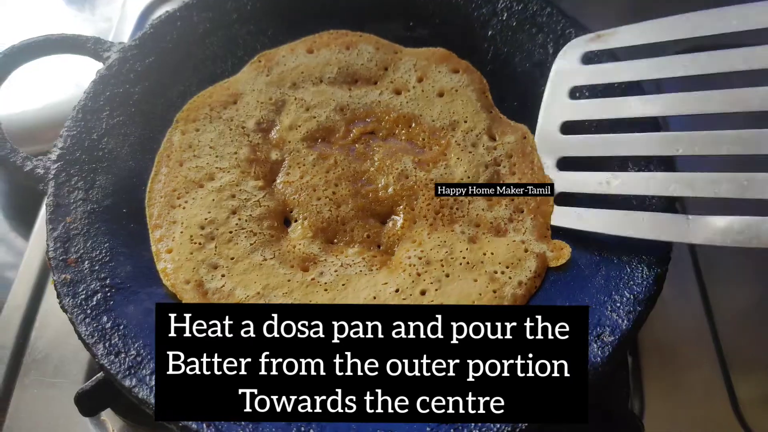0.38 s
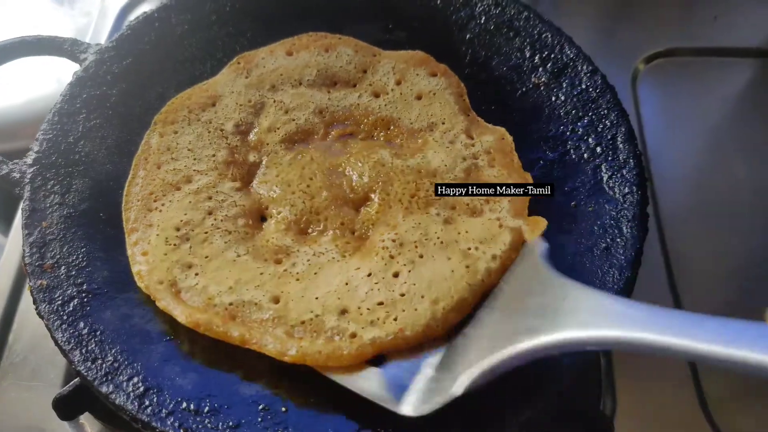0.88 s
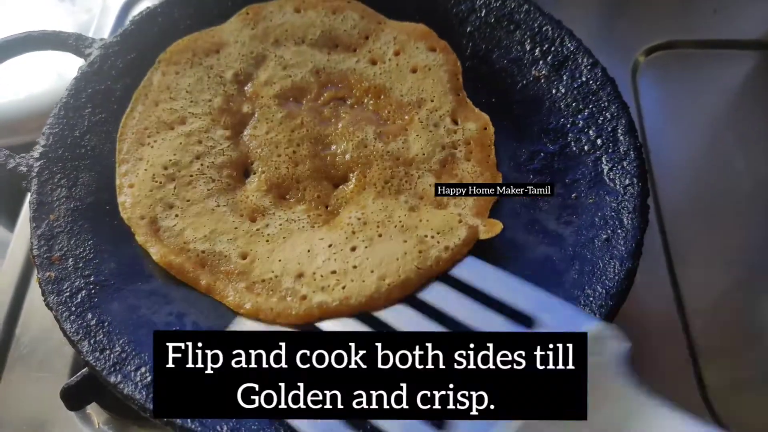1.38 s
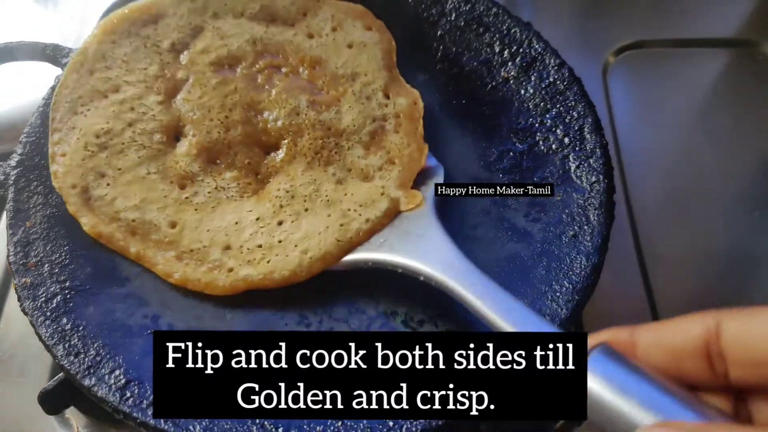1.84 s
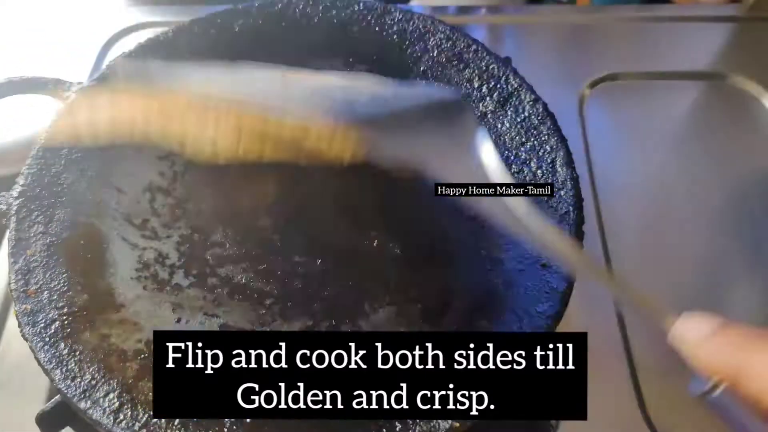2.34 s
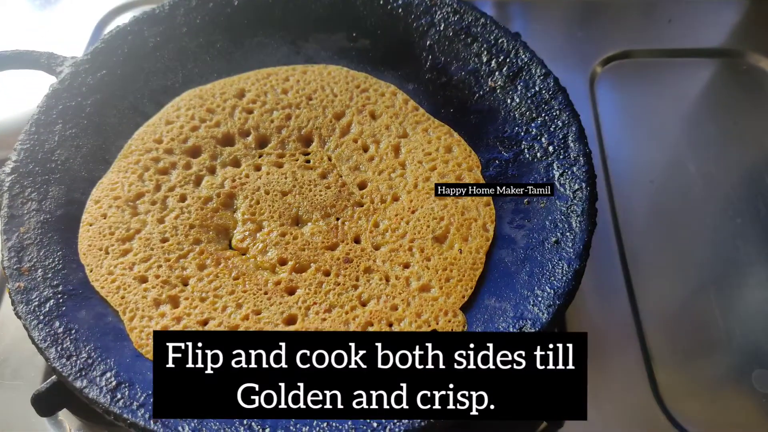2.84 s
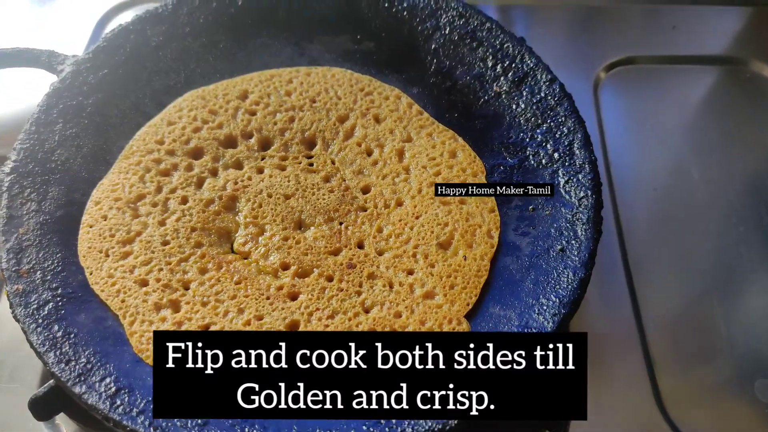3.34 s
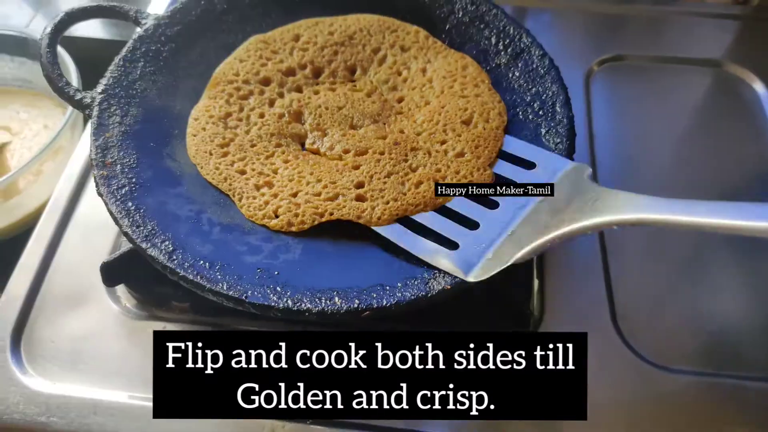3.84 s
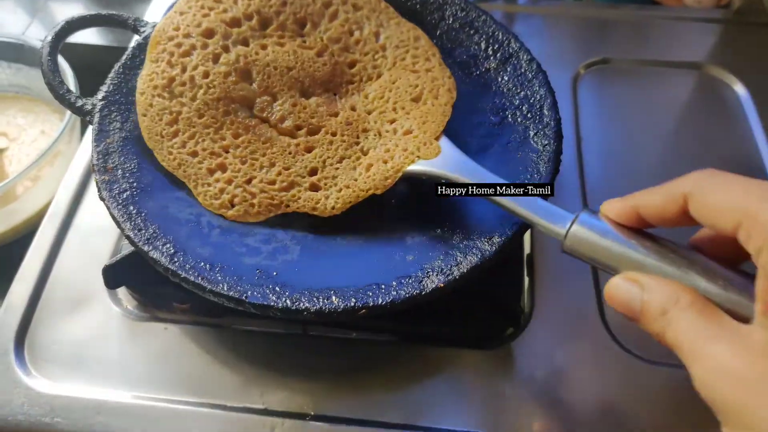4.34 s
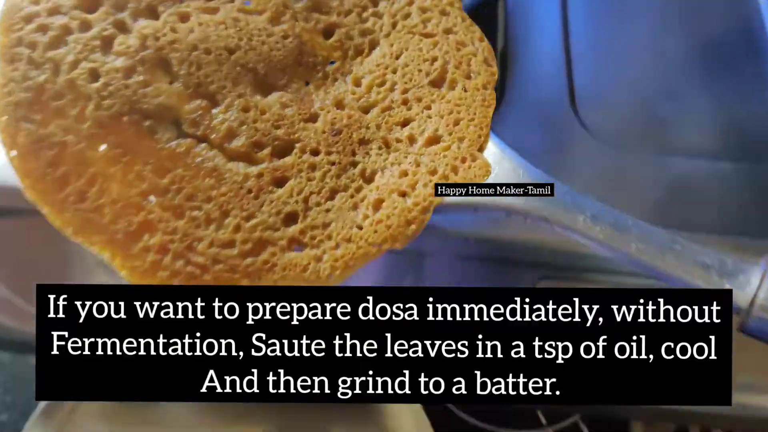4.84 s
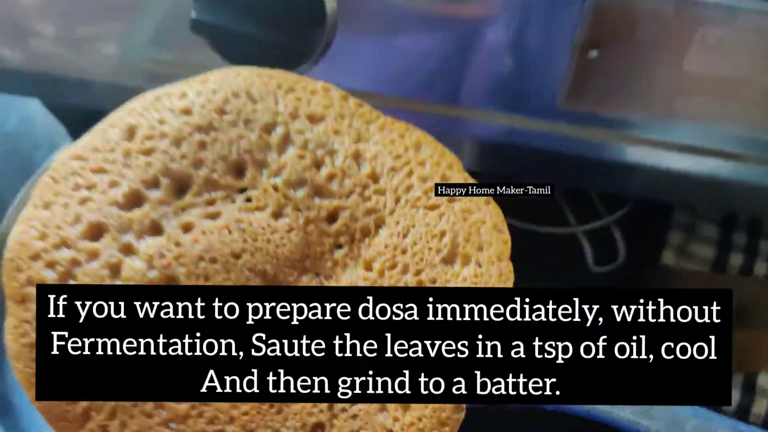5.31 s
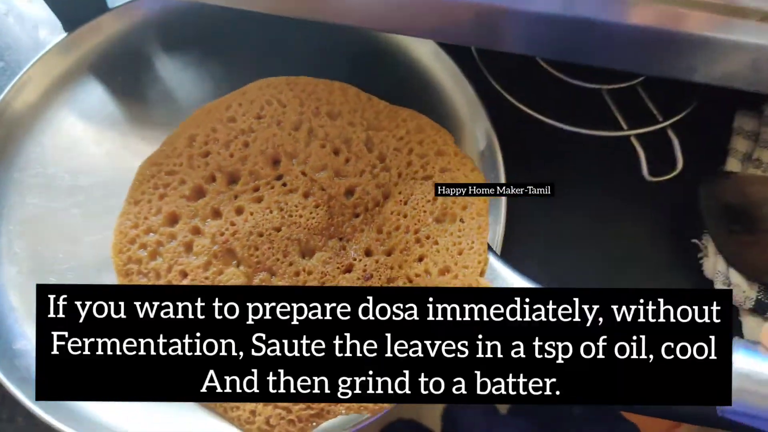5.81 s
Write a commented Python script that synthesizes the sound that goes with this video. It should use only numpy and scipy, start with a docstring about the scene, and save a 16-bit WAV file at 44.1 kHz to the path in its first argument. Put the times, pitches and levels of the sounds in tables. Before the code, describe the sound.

Silence for about 0.2 s, then a quick fade-in to a fine, steady frying hiss close to a phone microphone, over a low wavering motor hum near 100 and 200 Hz and soft kitchen rumble. From 0.8 to 1.7 s a steel spatula scrapes jerkily over rough iron, with blade tones around 2.7 to 5.4 kHz fluttering and fading and a few tiny fat ticks. At about 2.4 s the turned cake bursts into bright, dense crackle with many sharp spits, the strongest near 2.8 and 3.3 s. The hum weakens from about 2.5 s and stops by 3.3 s. Sound cuts hard at 3.6 s, with silence until 3.84 s. A calmer stretch fades in: steady hiss and rumble, a short scrape with a ring near 3.95 s, a few spits, a faint tick at 4.8 s and a barely audible scrape near 5.65 s. Crackle and metal lean right; low baseline thumps follow each start.

```python
"""A thick pancake fries on an iron griddle close to a phone; silence comes before each of two stretches.
First there is steady hiss (fizzing noise), motor hum (wavering tones) and kitchen rumble (soft noise).
A steel spatula scrapes and rings (jerky noise in resonances); then lively frying crackles (noise bursts).
Fat spits throughout (short clicks); the hum weakens and stops before the second, calmer stretch.
Two microphone ports colour the treble differently; the baseline swings soon after each stretch starts."""
import sys
import numpy as np
from scipy import signal
from scipy.fft import rfft, irfft
from scipy.io import wavfile
from scipy.ndimage import uniform_filter1d

SR = 44100
rng = np.random.default_rng(int(sys.argv[2]) if len(sys.argv) > 2 else 0)


def gain_from_decibels(decibels):
    """Convert decibel values to linear amplitude factors."""
    exponent = np.asarray(decibels, float) / 20
    return 10 ** exponent


def generate_wav(signal):
    """Clip the signal to [-1, 1] and save it as 16-bit WAV at the path in sys.argv[1]."""
    frames = np.transpose(np.atleast_2d(signal))
    scaled = np.clip(frames, -1, 1) * 32767
    pcm = np.round(scaled).astype(np.int16)
    wavfile.write(sys.argv[1], SR, pcm)


N = 261954
T = np.arange(N) / SR  # time [s]
HZ = np.arange(N // 2 + 1) * SR / N + 1  # frequency [Hz], raised by 1 to avoid zero


def curve(table, column):
    """Gain over time from rows of levels; silent outside them."""
    rows = np.array(table)
    return gain_from_decibels(np.interp(T, rows[:, 0], rows[:, column], left=-200, right=-200))


def shape(points):
    """Gain per frequency from (frequency [Hz], level [dB]) points."""
    hz, db = np.transpose(points)
    return gain_from_decibels(np.interp(np.log(HZ), np.log(hz), db))


def colour(x, gain):
    """Filter by a gain per frequency."""
    return irfft(rfft(x) * gain, N)


def resonance(hz, width):
    """Response of one ringing mode, gain 1 at its centre."""
    return 1 / (1 + 1j * (HZ ** 2 - hz ** 2) / (HZ * width))


def causal(gain):
    """Minimum-phase response with the same gain, so that clicks stay sharp."""
    cepstrum = irfft(np.log(gain), N)
    cepstrum[1:N // 2] *= 2
    cepstrum[N // 2 + 1:] = 0
    return np.exp(rfft(cepstrum))


# How each microphone port colours sound: (frequency [Hz], level [dB])
LEFT_PORT = [(1000, -0.5), (2400, 0), (3000, 1), (3800, -5), (4500, -6.5), (4900, -21), (5200, -25),
             (5500, -29), (6000, -6.5), (7000, 1), (8200, 8), (9200, 1.5), (10300, -2), (14500, -6),
             (15600, -14)]
RIGHT_PORT = [(1000, -0.5), (2400, -0.5), (3000, -1.5), (4000, 3), (4700, 3.5), (5300, 9.5), (5800, 2.5),
              (6700, -7), (7700, -26.5), (8200, -49), (8900, -33), (9600, -60.5), (10500, -13.5),
              (12500, -15), (15600, -7.5)]


def port_responses():
    """Each port has its own peaks and notches; the left one hears the treble later than the right."""
    lag_s = 0.0003615 / (1 + (700 / HZ) ** 2)  # fades out in the bass
    left = causal(shape(LEFT_PORT)) * np.exp(-2j * np.pi * HZ * lag_s)
    right = causal(shape(RIGHT_PORT))
    return np.array([left, right]) * (HZ < 15800)


PORTS = port_responses()


def unit(x, lo_hz, hi_hz):
    """Scale so that the band, heard as the average of both ports, has rms 1."""
    middle = (rfft(x) * PORTS).mean(axis=0)
    band = middle[(HZ > lo_hz) & (HZ < hi_hz)]
    return x * N / np.sqrt(2 * np.sum(np.abs(band) ** 2))


def walk(rate):
    """Random levels held 1 / rate s and smoothed twice; spread near 1."""
    hold = int(SR / rate)
    steps = np.repeat(rng.standard_normal(N // hold + 1), hold)
    return 2.25 * uniform_filter1d(uniform_filter1d(steps, hold), hold)[:N]


def pair(alike):
    """Two noises, left and right, that share a part."""
    mid, side = rng.standard_normal((2, N))
    share = np.clip(alike, 0, 1)
    return colour(mid, np.sqrt(1 + share)) + colour(side, np.sqrt(1 - share)) * np.array([[1], [-1]])


def grains(rate, spread_db):
    """Clicks at random moments, some much larger; each reaches the two ports with its own size."""
    happens, luck = rng.random((2, N))
    size = (happens < rate / SR) * gain_from_decibels(-spread_db * np.log(1 - .97 * luck))
    return size * rng.standard_normal((2, N))


def pan(db):
    """Left and right gains that differ by db."""
    return gain_from_decibels(np.array([[db], [-db]]) / 2)


def between(start, end, edge):
    """1 from start to end, 0 elsewhere, with ramps of edge s."""
    return np.clip(np.minimum(T - start, end - T) / edge + .5, 0, 1)


# Lively frying after the cake is turned: (time [s], level [dB])
FRY = [(2.2, -54), (2.355, -58), (2.372, -32.5), (2.388, -32), (2.4, -45), (2.44, -36), (2.55, -44.5),
       (2.72, -39), (2.82, -52), (2.9, -40.5), (3.03, -44), (3.21, -39.5), (3.298, -43), (3.308, -34.5),
       (3.39, -60), (3.41, -43), (3.62, -41.5)]


def fry():
    """Fresh batter on hot fat: dense, bright crackle of tiny noise bursts near the right port."""
    clicks = grains(rate=700., spread_db=4.8)
    burst = np.exp(-T[:300] / 0.00089) * rng.standard_normal(300)
    crackle = signal.fftconvolve(clicks, burst[None], axes=1)[:, :N]
    mix = crackle / crackle.std() + 0.76 * pair(.2)
    tone = shape([(700, -22.5), (2000, -3.0), (4000, -1.5), (8000, -3), (15000, 1.5)])
    return unit(colour(mix, tone) * pan(-6.5), 4500, 6900) * curve(FRY, column=1)


# Steady hiss: (time [s], level [dB])
HISS = [(.18, -47), (.83, -46.5), (1.8, -46.5), (2.34, -47), (2.39, -43.5), (3.62, -45.5), (3.84, -44.5),
        (4.1, -46), (5.95, -47.5)]


def hiss():
    """Steam leaving the batter through countless pores, with a fine fizz of tiny bursts."""
    fizz = grains(rate=820.0, spread_db=2.0)
    steam = pair(0.33) * gain_from_decibels(0.51 * walk(12))
    mix = steam + .5 * fizz / fizz.std()
    return unit(colour(mix, 1 / (1 + (900 / HZ) ** 3)), 7300, 9480) * curve(HISS, column=1)


# Sharp ticks, mostly spitting fat, before colouring:
# (time [s], relative level [dB], left minus right [dB], centre frequency [Hz])
SPITS = [(0.957, -23.5, -8, 4910), (1.2285, -25, -11, 5350), (1.6794, -22.5, -17, 5220),
         (2.2286, -23, -6, 5300), (2.3725, -21, -12, 5000), (2.381, -20, -5, 5020),
         (2.418, -21, -8.5, 1780), (2.4406, -14, -5, 5180), (2.4713, -13, -8, 4560),
         (2.5316, -18.5, -3, 7970), (2.6264, -24, -7, 5410), (2.7646, -22, -13, 4980),
         (2.7739, -10.5, 3.5, 4730), (2.784, -15.5, -3, 8440), (2.8983, -21.5, -3, 5440),
         (2.9864, -21, -5, 5160), (3.022, -23, -6, 5000), (3.1447, -18.5, -7, 5070),
         (3.1857, -22.5, -9.5, 5080), (3.211, -21.5, -6.5, 5000), (3.2228, -23, -6, 4800),
         (3.256, -24.5, -5, 4500), (3.2612, -18, -4, 2300), (3.266, -21.5, -7, 4800),
         (3.3024, -5.5, 7, 4020), (3.3132, -19, 7, 3500), (3.4172, -16, 0, 5500), (3.5047, -19, -2.5, 4790),
         (3.5182, -17, 2, 5330), (3.8551, -20, -4, 5460), (3.937, -20, 4, 4470), (3.9883, -18.5, 5, 4500),
         (4.813, -28.5, -8, 4960)]


def spits():
    """A bubble bursts: a click of about one cycle with a sharp edge, then a short spray."""
    left_lead_s = .00011  # the fat spits nearer the left port than the other sources
    spray_t60_s = 0.019
    out = np.zeros((2, N + 2000))
    t = T[:2000] - .0012 + np.array([[left_lead_s], [0]])
    spray = rng.standard_normal((len(SPITS), 2, 2000))
    for (s, db, pan_db, hz), noise in zip(SPITS, spray):
        i = int(s * SR)
        click = 1.15 * np.exp(-(0.84 * hz * t) ** 2) * np.cos(2 * np.pi * hz * t + .6)
        edge = gain_from_decibels(-4) * np.exp(-(t / .00002) ** 2)
        tail = 0.44 * noise * np.exp(-np.log(1000) * t / spray_t60_s) * (t > 0)
        out[:, i:i + 2000] += gain_from_decibels(db) * pan(pan_db) * (click + edge + tail)
    tone = shape([(500, -11), (1500, 1.5), (3000, 1), (8000, 0.0), (15000, 1)])
    return colour(out[:, :N], causal(tone))


# Spatula dragged over the iron: (peak time [s], rise per 20 dB [s], fall per 20 dB [s],
# relative level [dB], drive of the pan body above it [dB])
SCRAPE = [(.8, .38, .1, -34, -12), (.85, .03, .11, -28, -4), (.97, .03, .2, -44, -12),
          (1.056, .08, .1, -33.5, -14.5), (1.178, .06, .15, -34, -15), (1.228, .1, .09, -28.5, -24),
          (1.368, .035, .15, -26.5, -23), (1.415, .08, .06, -23.5, -22.5), (1.464, .05, .04, -27, -14),
          (1.666, .45, .09, -30, -10.5), (1.85, .3, .1, -47.5, -4), (3.945, .04, .5, -39.5, -6.5),
          (4.03, .06, 0.2, -36, -13.5), (5.65, .1, .15, -48.5, -8)]


def strokes():
    """Pressure of the edge on the iron, and the share of it that drives the pan body."""
    push, body = 0, 0
    for s, rise, fall, db, body_db in SCRAPE:
        away = np.maximum((s - T) / rise, (T - s) / fall)
        power = gain_from_decibels(2 * (db - 20 * np.minimum(away, 10)))
        push = push + power
        body = body + power * gain_from_decibels(2 * body_db)
    return np.sqrt(push), np.sqrt(body)


# Ringing modes of the spatula blade and of the pan:
# (frequency [Hz], width [Hz], relative level [dB])
BLADE = [(2050, 200, -15), (2710, 90, -6), (3208, 65, -3.5), (3480, 80, -10.5), (4020, 77, -5.5),
         (4115, 55, -9), (4470, 60, -12.5), (4780, 79, -13), (5180, 29, -15), (5400, 110, -9.5),
         (6830, 27, -2), (7150, 34, -12.5), (7510, 89, -8), (10400, 67, -3.5), (11240, 100, -13.5)]
PAN_BODY = [(480, 200, -3.5), (1065, 300, 3), (1602, 68, 1), (1950, 200, 0)]


def scrape():
    """The edge catches on rough iron in quick jerks, feeding blade modes unevenly; the pan drones below."""
    jerks = grains(rate=1200., spread_db=3.0)
    rub = (jerks / jerks.std() + 1.1 * pair(.37)) * gain_from_decibels(0.85 * walk(60))
    push, drone = strokes()
    blade = 0
    for hz, width, db in BLADE:
        feed = rub * push * gain_from_decibels(3.5 * walk(24.96))
        blade = blade + gain_from_decibels(db) * colour(feed, resonance(hz, width))
    grit_tone = shape([(1500, -28.5), (3500, -10.5), (6000, -9), (9000, -11.0), (15000, -8)])
    grit = colour(rub * push, grit_tone)
    # after levelling, give the steel back the overall strength of the strokes
    steel = unit((blade + grit) * pan(-8.5), 2500, 6000) * np.sqrt(np.mean(push ** 2)) * gain_from_decibels(1.5)
    body_tone = sum(gain_from_decibels(db) * resonance(hz, width) for hz, width, db in PAN_BODY)
    body = unit(colour(rub, body_tone), 900, 2200) * drone * gain_from_decibels(-5.0) * pan(-2.5)
    return steel + body


# One blade mode singing out for a moment, before its flutter and the port colour:
# (time [s], rise [s], time to fall 60 dB [s], frequency [Hz], level [dB])
SINGS = [(0.844, .008, 0.21, 2710, -26), (.848, 0.0036, 0.038, 5520, -23.5), (1.15, 0.036, .4, 5400, -35.5),
         (1.501, 0.07, 0.54, 5400, -42), (1.597, 0.065, 0.22, 2710, -32), (1.6, 0.027, 0.51, 3970, -34.5),
         (1.859, 0.0033, 0.18, 2710, -38.5), (3.941, 0.021, 0.26, 4020, -36), (3.95, 0.021, .3, 2050, -41),
         (3.968, 0.026, 0.18, 1412, -29)]


def sings():
    """Single blade modes, heard as fluttering tones that swell and fade."""
    out = 0
    for s, rise, t60, hz, db in SINGS:
        t = np.maximum(T - s, 0)
        fall = np.exp(-np.log(1000) * np.maximum(t - rise, 0) / t60)
        swell = np.minimum(t / rise, 1) * fall
        tone = np.sin(2 * np.pi * hz * t) * gain_from_decibels(1.9 * walk(90))
        out = out + gain_from_decibels(db) * swell * tone * pan(-7.5)
    return out


# Motor hum tones: (frequency [Hz], relative level [dB], width of the waver [Hz])
HUM_LINES = [(98.7, 0.5, 2.4), (181.2, -9, 10), (198, -5, 4.5), (295, -33.5, 6), (373, -15, 15)]


def hum():
    """Mains motor tones that waver (narrow noise around a steady tone), throb slowly, weaken and stop."""
    level_db, throb_db, throb_s, throb_peak_s = -39.5, 1.5, 0.6, 0.57
    weakens_s, upper_earlier_s, weakens_db, stops_s = 2.65, 0.36, -9.5, 3.27
    lines = 0
    for hz, db, width in HUM_LINES:
        waver = colour(rng.standard_normal(N), resonance(hz, width) ** 2)
        tone = np.sin(2 * np.pi * hz * T) + .15 * waver / waver.std()
        start = weakens_s - upper_earlier_s * (hz > 150)  # the upper tones weaken first
        lines = lines + gain_from_decibels(db + weakens_db * between(start, 7, .2)) * tone
    throb = throb_db * np.cos(2 * np.pi * (T - throb_peak_s) / throb_s)
    return lines * gain_from_decibels(level_db + throb) * between(0, stops_s, .08) * pan(-5.5)


# Loudness of the kitchen: (time [s], rumble level [dB], deep rumble level [dB])
KITCHEN = [(.18, -49.5, -50), (.8, -47.5, -49.5), (1.15, -49.5, -51), (2.3, -45.5, -52), (2.44, -43.5, -49),
           (2.75, -47.5, -53), (2.82, -49.5, -50), (3.3, -47, -49), (3.44, -45, -41.5), (3.62, -47, -45.5),
           (3.84, -49.5, -50), (4.25, -49.5, -50), (4.4, -47.5, -48), (5.95, -47.5, -54)]
# Tone of the rumble, before its further slopes: (frequency [Hz], level per Hz [dB])
RUMBLE = [(12, -33), (20, -1), (32, -24.5), (60, -8.5), (86, -5), (145, -6), (226, -15.5), (318, -14.5),
          (874, -21), (2500, -26.5), (3250, -36.5), (5500, -120)]


def rumble():
    """Kitchen air and burner: soft noise, mostly alike in both ports in the bass."""
    air_tone = shape(RUMBLE) / (1 + (HZ / 2500) ** 4) / (1 + (110 / HZ) ** 4)
    air = colour(pair(0.92 / (1 + (HZ / 800) ** 3)), air_tone)
    deep_tone = 1 / (1 + (HZ / 85) ** 6) / (1 + (45 / HZ) ** 2)
    deep = colour(pair(0.9 / (1 + (38 / HZ) ** 4)), deep_tone)
    air = unit(air, 250, 890) * gain_from_decibels(0.34 * walk(8.6)) * curve(KITCHEN, column=1) * pan(-0.97)
    deep = unit(deep, 40, 88) * curve(KITCHEN, column=2) * pan(-2.5)
    # the rumble dips briefly by 13 dB after the loudest tick
    return (air + deep) * gain_from_decibels(-13 * between(3.31, 3.405, .012))


# Stretches of sound: (start [s], end [s], baseline swing start [s],
# swing size before leaking and rounding [full scale], swing rise [s])
STRETCHES = [(.181, 3.614, .327, .358, .154), (3.835, 6, 3.929, .26, .217)]
# Fade-in, one row for each stretch: (time to climb by a gain of 1 [s]) and (starting level [dB])
FADE_IN_S = [0.28, .17]
FADE_FROM_DB = [-23.5, -19]


def stretches():
    """When sound is on, how it fades in, and the baseline swing, mostly in the right port."""
    settle_s, left_share = .205, .05
    on, fade, swing = 0, 0, 0
    for (start, end, swing_s, size, rise), fade_s, from_db in zip(STRETCHES, FADE_IN_S, FADE_FROM_DB):
        inside = (T >= start) & (T < end)
        on = on + 1. * inside
        fade = fade + inside * np.minimum(gain_from_decibels(from_db) + (T - start) / fade_s, 1)
        t = np.maximum(T - swing_s, 0) / rise
        swing = swing + size * (t * np.exp(1 - t)) ** 2
    # the offset leaks away, so the baseline overshoots before it settles
    keep = np.exp(-1 / (settle_s * SR))
    swing = signal.lfilter([keep, -keep], [1, -keep], swing) * np.array([[left_share], [1]])
    return on, fade, swing


def scene():
    """All sources as they reach the two ports."""
    return fry() + hiss() + spits() + scrape() + sings() + hum() + rumble()


def top_cut(x):
    """Nothing passes above the cut-off."""
    return signal.sosfilt(signal.butter(12, 16990, fs=SR, output="sos"), x)


def record(dry):
    """Port colour, fade-in, baseline swing, rounded peaks, hard stops."""
    on, fade, swing = stretches()
    rounded = np.tanh(colour(dry, PORTS) * fade + swing)
    mix = rounded * uniform_filter1d(on, size=80)
    return top_cut(mix)


dry = scene()
out = record(dry)
generate_wav(out)
```